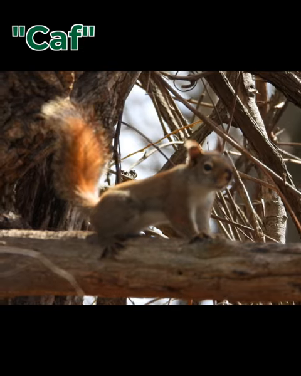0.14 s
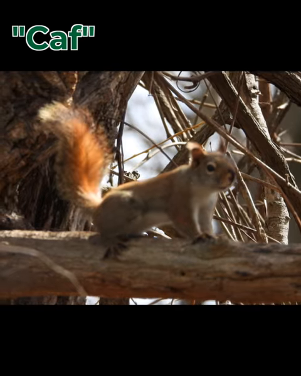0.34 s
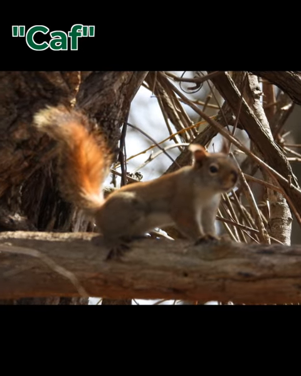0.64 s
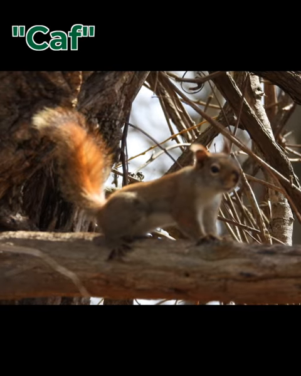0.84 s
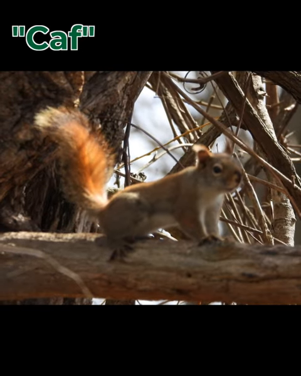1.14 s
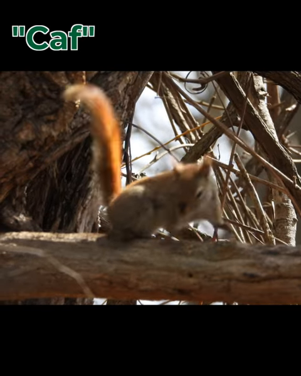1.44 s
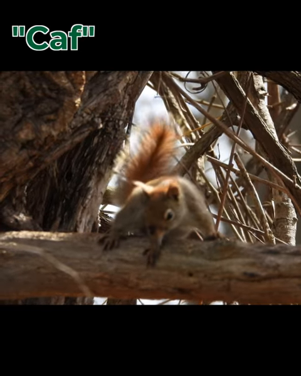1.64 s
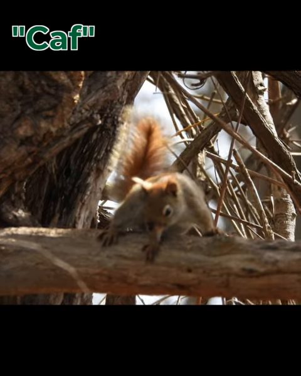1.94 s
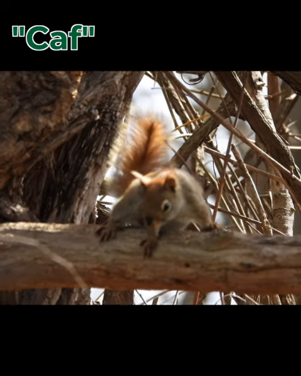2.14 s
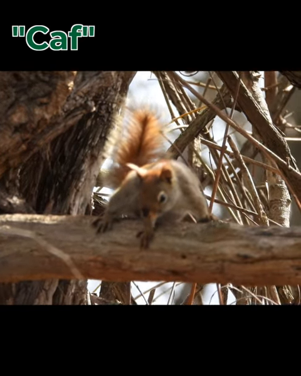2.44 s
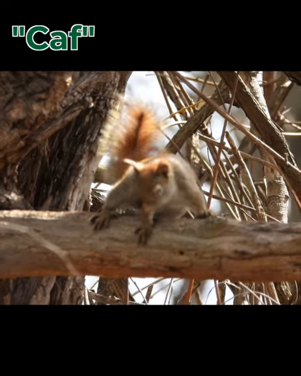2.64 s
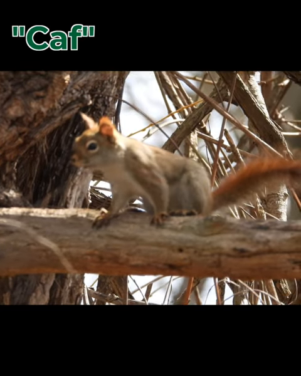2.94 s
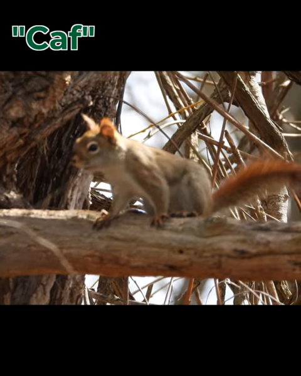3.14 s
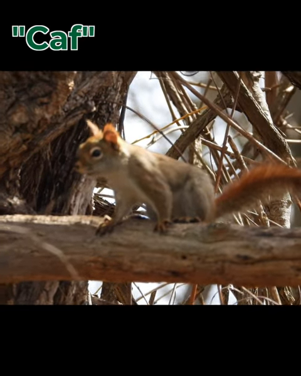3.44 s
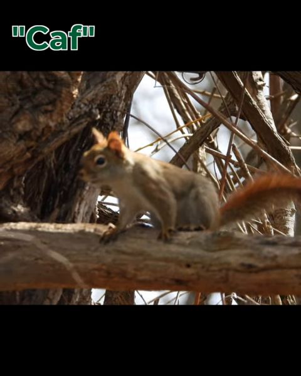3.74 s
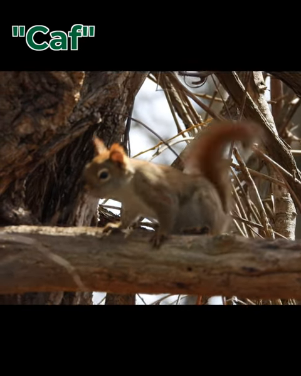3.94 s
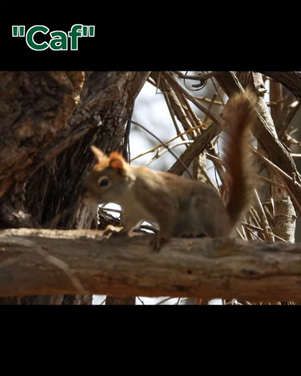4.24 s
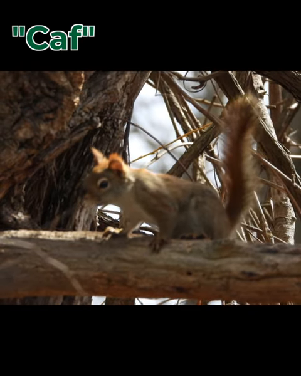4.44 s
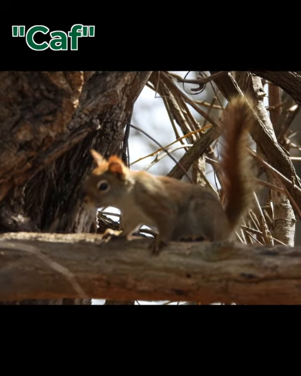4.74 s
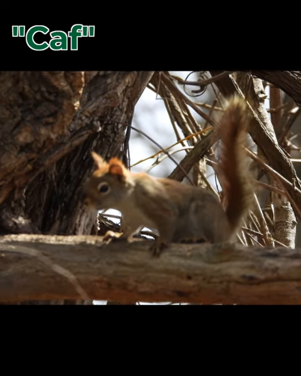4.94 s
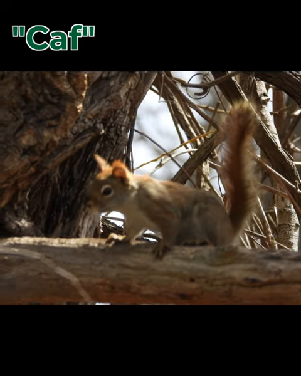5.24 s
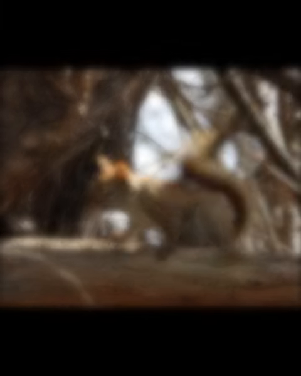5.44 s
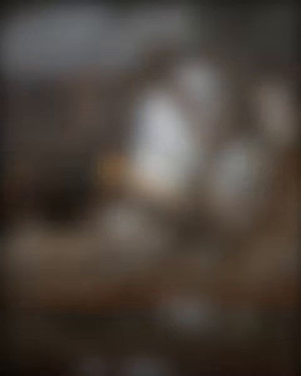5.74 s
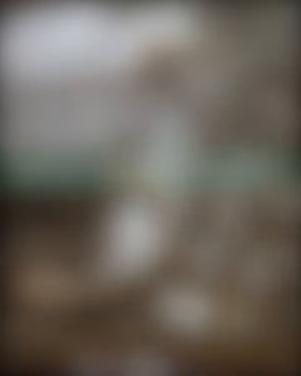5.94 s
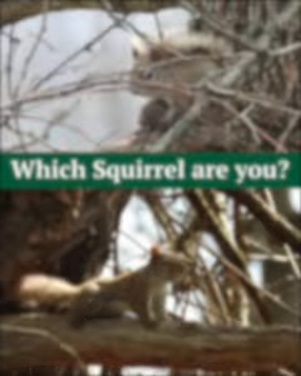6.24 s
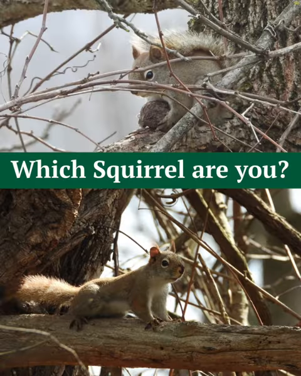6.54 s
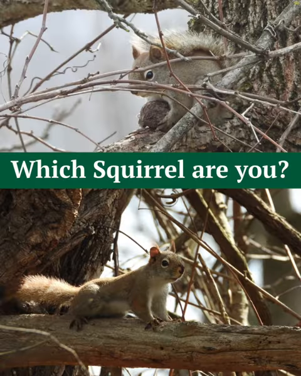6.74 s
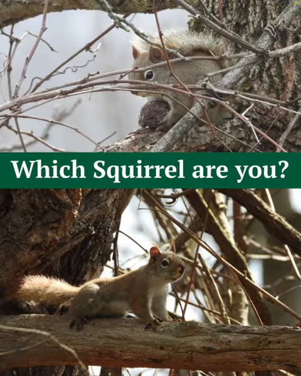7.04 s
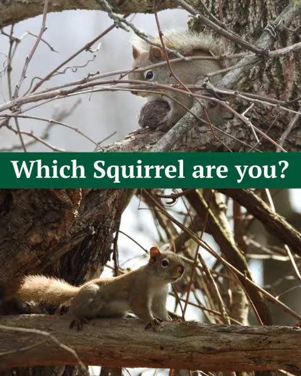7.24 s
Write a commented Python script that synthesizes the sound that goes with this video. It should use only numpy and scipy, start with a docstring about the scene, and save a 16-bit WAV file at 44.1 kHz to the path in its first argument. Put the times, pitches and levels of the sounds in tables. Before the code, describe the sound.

Outdoors among trees, a squirrel scolds close to a stereo microphone, slightly right. Six very short piercing squeaks come at uneven intervals, with softer, rough two-toned chucks between them. Thin bird chips sound early and late, and a quick high bird phrase falls near the middle. Claws scuff bark faintly. Soft hiss, distant rumble and a passing engine hum lie beneath, with a puff of air at the end.

```python
"""From the start filtered noise gives a hiss and a distant rumble with hollow swells, over a brief low bump.
At once a red squirrel scolds from a branch: frequency-modulated arched squeaks, with softer two-voiced chucks
between, until near the end. Birds chip thinly early and late; claws scuff the bark. From 1.6 s an engine hum swells
and fades; about 3 s comes a harmonic mew, then a quick bird phrase of paired tones. Near the end a puff of air
touches the microphone. Trunks and twigs scatter the animal sounds back as decaying noise echoes."""
import sys
import numpy as np
from scipy import signal
from scipy.io import wavfile
from scipy.ndimage import uniform_filter1d, map_coordinates

SR = 44100
rng = np.random.default_rng(int(sys.argv[2]) if len(sys.argv) > 2 else 0)


def to_wav(sig):
    """Store sig (one row per channel, or 1-D mono) as 16-bit WAV at the path in sys.argv[1].

    Samples outside -1..1 are clipped; the rate is SR.
    """
    pcm = np.clip(np.atleast_2d(sig), -1, 1) * 32767
    pcm = np.round(pcm).astype(np.int16)
    wavfile.write(sys.argv[1], SR, pcm.T)  # frames by channels


N = 325192
TIME = np.arange(N) / SR


def from_db(db):
    """Level in decibels to amplitude ratio."""
    return 10 ** (np.asarray(db) / 20)


def rms_one(x):
    """Normalise the mean power to 1."""
    return x / np.sqrt(np.mean(x ** 2) + 1e-20)


def along(rows, t):
    """Linear interpolation of each column of a curve at the times t."""
    s, *columns = np.transpose(rows)
    return [np.interp(t, s, c) for c in columns]


def at_hz(points, hz):
    """Interpolation of a spectrum on a logarithmic frequency axis."""
    f, value = np.transpose(points)
    return np.interp(np.log(hz + 1e-6), np.log(f), value)


def drift(rate, size):
    """Low-frequency random modulation: Gaussian knots of spread 1, rate per second, joined by lines."""
    knots = rng.standard_normal(8192)
    return np.interp(np.arange(size) * rate / SR, np.arange(len(knots)), knots)


def phase_of(hz):
    """Phase as the time integral of instantaneous frequency."""
    return 2 * np.pi * np.cumsum(hz) / SR


def fade(t, edge):
    """Raised-cosine gate whose two edges last edge, in the units of t."""
    to_nearest_end = np.minimum(t - t[0], t[-1] - t)
    return np.sin(np.pi / 2 * np.clip(to_nearest_end / edge, 0, 1)) ** 2


def passing(start, length, fade_s):
    """Amplitude envelope over the whole scene that fades in, stays and fades out."""
    out = np.zeros(N)
    add(out, start, fade(np.arange(0, length, 1 / SR), fade_s))
    return out


def envelope(t, attack_s, release_s, edge_db):
    """Exponential attack and release: the level climbs linearly from edge_db and sinks back to it."""
    toward_edge = np.maximum(1 - t / attack_s, 1 - (t[-1] - t) / release_s)
    return from_db(edge_db * np.clip(toward_edge, 0, 1))


def bump(t, at_s, width_s):
    """Gaussian pulse of height 1."""
    return np.exp(-((t - at_s) / width_s) ** 2)


def arch(t, rise_s, fall_s, scoop, dive):
    """Frequency ratio with parabolic ends: it scoops up to 1 and dives at the end."""
    scooped = scoop * np.clip(1 - t / rise_s, 0, 1) ** 2
    dived = dive * np.clip(1 - (t[-1] - t) / fall_s, 0, 1) ** 2
    return 1 - scooped - dived


def hoarse(phase, width_hz):
    """Random quadrature modulation: a band of noise that follows a pitch."""
    return drift(width_hz, len(phase)) * np.sin(phase) + drift(width_hz, len(phase)) * np.cos(phase)


def whistle(length, hz, glide_hz, waver_hz):
    """A sinusoid randomly frequency-modulated about a linear glide."""
    u = np.linspace(0, 1, int(length * SR))
    return fade(u, 0.085) * np.sin(phase_of(hz + glide_hz * (u - .5) + waver_hz * drift(900, len(u))))


def add(out, start, sound):
    """Linear superposition of a sound at its start time."""
    i = max(int(start * SR), 0)
    out[i:i + len(sound)] += sound[:N - i]


def stereo_noise(spectrum, patchy_db, wider_db=0):
    """Mid-side shaping of noise: mostly coherent in the bass and diffuse in the treble, in random patches."""
    # side level against the middle: (frequency [Hz], level [dB])
    width_points = [(60, -8), (110, -16.5), (200, -17), (380, -15.5), (700, -13), (1290, -11), (2380, -8.5),
                    (4400, -2), (8120, -0.5), (15000, 0.5)]
    # left-right balance: (frequency [Hz], left over right [dB])
    balance_points = [(60, 3), (150, -0.5), (380, 1.0), (950, 0.5), (2380, 1), (5980, -2.5), (15000, 3)]
    hz, s, (mid, side) = signal.stft(rng.standard_normal((2, N)), SR, nperseg=2048)
    # smooth the patches over frequency, then over time
    patches = uniform_filter1d(rng.standard_normal(mid.shape), size=3, axis=0)
    patches = rms_one(uniform_filter1d(patches, size=4, axis=1))
    hz, sign = hz[:, None], np.array([1, -1])[:, None, None]
    both = mid + sign * side * from_db(at_hz(width_points, hz) + wider_db)
    balance = sign * at_hz(balance_points, hz) / 2
    gain = from_db(at_hz(spectrum, hz) + balance + patchy_db * patches)
    return rms_one(signal.istft(both * gain, SR)[1][:, :N])


def swells(waver=0.068):
    """Slow amplitude modulation: faint hollow tones of wavering pitch rise out of the rumble and sink back."""
    # hollow tones: (start [s], length [s], pitch [Hz], level [dB])
    hollow_tones = [(0.04, 0.13, 399, -47), (0.227, 0.14, 347, -47.5), (0.823, 0.081, 358, -48.5),
                    (1.374, 0.25, 478, -47.5), (1.597, 0.078, 462, -42.5), (2.937, 0.12, 377.6, -44),
                    (4.492, .18, 351.5, -46.5), (5.413, 0.18, 384, -48)]
    out = np.zeros(N)
    for start, length, hz, db in hollow_tones:
        size = int(length * SR)
        tone = np.sin(phase_of(hz * (1 + waver * drift(56.8, size))))
        add(out, start, from_db(db) * np.hanning(size) * tone)
    return out


def engine_hum(third_db=-4):
    """A periodic source: a wavering fundamental with a third harmonic of randomly varying amplitude."""
    phase = phase_of(127.6 * (1 + .008 * drift(4, N)))
    third = from_db(third_db) * drift(9, N) * np.sin(3 * phase)
    return from_db(-59) * passing(start=1.57, length=2.85, fade_s=0.49) * (np.sin(phase) + third)


def bump_and_puff():
    """Gated low-frequency noise with a strong side signal: a low bump, and late a puff of air on the microphone."""
    # a brief low bump at the start, then the late puff: (start [s], length [s], level [dB])
    gust_rows = [(0, 0.057, -44), (7.09, 0.238, -45)]
    # relative spectrum of both: (frequency [Hz], level [dB])
    gust_spectrum = [(30, -34), (80, -10), (150, 3), (230, -6), (400, -64), (900, -64)]
    level = sum(from_db(db) * passing(start, length, fade_s=0.045) for start, length, db in gust_rows)
    return level * stereo_noise(gust_spectrum, patchy_db=-1.5, wider_db=17.0)


def background(swell_db=0.2, rumble_gain_db=0.5, hiss_gain_db=2):
    """Superposed sources: distant rumble and hiss as filtered noise, hollow swells, engine hum, bump and puff."""
    # relative spectrum of the rumble: (frequency [Hz], level [dB])
    rumble_spectrum = [(18, -69), (30, -44), (43, -43), (64, -33), (91, -9), (118, -4.5), (185, -2),
                       (213, -0.5), (259, -7), (357, -0.5), (419, -5.5), (578, -6), (772, -11),
                       (1070, -26.5), (1400, -33.5), (1820, -23), (3080, -120)]
    # relative spectrum of the hiss: (frequency [Hz], level [dB])
    hiss_spectrum = [(710, -20), (1200, -16.5), (1850, -10.5), (2040, -13), (2820, -10), (4130, -2.5),
                     (4890, 0), (5210, -1), (6310, -1.5), (7160, -4.5), (9130, -15), (10900, -22),
                     (12700, -29.5), (15000, -50)]
    # levels before the common gains: (time [s], rumble level [dB], hiss level [dB])
    background_levels = [(0.0, -53, -47.5), (0.51, -51.5, -48), (1.39, -51.5, -48.5), (5.09, -52, -46.5),
                         (5.77, -54.5, -49), (7.12, -51.5, -48), (7.37, -52, -47.5)]
    rumble_db, hiss_db = along(background_levels, TIME)
    rumble_level = from_db(rumble_db + rumble_gain_db + swell_db * drift(15, N))
    rumble = rumble_level * stereo_noise(rumble_spectrum, patchy_db=4.0)
    hiss = from_db(hiss_db + hiss_gain_db) * stereo_noise(hiss_spectrum, patchy_db=2.8)
    return rumble + swells() + hiss + engine_hum() + bump_and_puff()


def woods(x, pan_db, near_db, far_db, near_t60=0.14, far_t60=0.67, alike=0.43, build_s=0.0058,
          bark_hz=6500, twigs_db=-20, twigs_hz=5100):
    """Multiple scattering: nearby branches give a dense short echo, further trunks a longer wash."""
    t = TIME[:SR]
    shared, apart = rng.standard_normal(SR), rng.standard_normal((2, SR))
    share = np.clip(alike, 0, 1)  # power common to both channels
    scatter = np.sqrt(share) * shared + np.sqrt(1 - share) * apart
    scatter = scatter * np.clip(t / build_s, 0, 1) ** 2
    # t60: seconds to decay by 60 dB
    near, far = (rms_one(np.exp(-np.log(1000) * t / t60)) / np.sqrt(SR) for t60 in (near_t60, far_t60))
    echo = scatter * np.hypot(from_db(near_db) * near, from_db(far_db) * far)
    # twigs return one band most strongly; rough bark and needles swallow the treble
    echo = echo + from_db(twigs_db) * signal.lfilter(*signal.iirpeak(twigs_hz, 5, fs=SR), echo)
    echo = signal.sosfilt(signal.butter(2, bark_hz, fs=SR, output="sos"), echo)
    scattered = signal.fftconvolve(x[None], echo, axes=1)[:, :N]
    return (x + scattered) * from_db(np.array([[1], [-1]]) * pan_db / 2)


def between_ports(x, lag_samples):
    """Interchannel time difference: the sound reaches the left port a moment after the right one."""
    return np.array([map_coordinates(x[0], [np.arange(N) - lag_samples], order=3), x[1]])


def distant_calls(clear_waver_hz=90, buzzy_waver_hz=320, slur_width_hz=1400):
    """Frequency glides: bird chips dive ever faster, hoarse slurs rise, paired and lone whistles stay nearly level."""
    # small birds' falling chips: (start [s], length [s], starting pitch [Hz], level [dB])
    chip_rows = [(0.344, .014, 5100, -40), (.356, 0.0074, 6500, -35), (0.412, 0.01, 5020, -36),
                 (0.418, 0.015, 5450, -30), (0.435, 0.0083, 5400, -38), (2.494, 0.017, 5150, -42),
                 (5.766, 0.015, 7700, -30), (7.238, 0.014, 7800, -24)]
    # hoarse rising slurs: two faint, like distant chucks, then two from a bird:
    # (start [s], length [s], from pitch [Hz], to pitch [Hz], level [dB])
    slur_rows = [(2.197, 0.055, 3890, 4150, -52), (2.336, .08, 3950, 4160, -49),
                 (5.712, .04, 2590, 4630, -43.5), (7.188, 0.037, 2895, 4600, -42.5)]
    # one bird's two-voiced notes:
    # (start [s], clear pitch [Hz], clear level [dB], buzzy pitch [Hz], buzzy level [dB])
    phrase_rows = [(3.461, 7480, -44, 6800, -38.5), (3.597, 7500, -41.5, 6550, -42),
                   (3.723, 7880, -41, 7070, -41), (3.831, 8290, -41, 7400, -42),
                   (3.96, 7870, -43.5, 7700, -47)]
    # lone thin whistles: (start [s], length [s], middle pitch [Hz], glide [Hz], level [dB])
    whistle_rows = [(2.368, 0.056, 4115, 120, -48), (4.514, 0.15, 5950, -250, -47.5),
                    (4.706, 0.097, 4540, 80, -43.5), (4.806, 0.31, 4760, 122, -45.5),
                    (5.567, 0.039, 6800, -60, -50), (5.643, 0.029, 2280, 3, -53),
                    (6.434, 0.12, 6860, -64, -48), (7.119, 0.026, 2254, 0, -50.5)]
    out = np.zeros(N)
    for start, length, hz, db in chip_rows:
        u = np.linspace(0, 1, int(length * SR))
        falling_hz = hz * (1 - 0.243 * u ** 1.78)  # loses 24.3 % of its pitch
        add(out, start, from_db(db) * np.sin(np.pi * u ** 2.43) * np.sin(phase_of(falling_hz)))
    for start, length, from_hz, to_hz, db in slur_rows:
        u = np.linspace(0, 1, int(length * SR))
        phase = phase_of(from_hz + (to_hz - from_hz) * u)
        add(out, start, from_db(db) * fade(u, 0.14) * hoarse(phase, slur_width_hz))
    note_s, note_glide_hz = 0.056, -62
    for start, clear_hz, clear_db, buzzy_hz, buzzy_db in phrase_rows:
        add(out, start, from_db(clear_db) * whistle(note_s, clear_hz, note_glide_hz, clear_waver_hz))
        add(out, start, from_db(buzzy_db) * whistle(note_s, buzzy_hz, note_glide_hz, buzzy_waver_hz))
    flicker_db, flickers_per_s = 2.5, 72
    for start, length, hz, glide_hz, db in whistle_rows:
        note = whistle(length, hz, glide_hz, waver_hz=0.027 * hz)
        add(out, start, from_db(db + flicker_db * drift(flickers_per_s, len(note))) * note)
    return out


def scuffs(spread=1.35):
    """Friction noise: claws on bark give short gritty bursts of impulsive, band-passed noise."""
    # scuffs: (start [s], length [s], centre frequency [Hz], level before the bell-shaped window [dB])
    scuff_rows = [(0.349, 0.043, 5100, -42.5), (2.392, 0.013, 5700, -43), (3.664, 0.0094, 4900, -38),
                  (5.873, 0.035, 4960, -42.5)]
    out = np.zeros(N)
    ratio = max(spread, 1.05)
    for start, length, hz, db in scuff_rows:
        grit = rng.laplace(size=SR)[:int(length * SR)]
        band = signal.butter(2, [hz / ratio, hz * ratio], "band", fs=SR, output="sos")
        rub = rms_one(signal.sosfilt(band, signal.sosfilt(band, grit)))
        add(out, start, from_db(db) * rub * np.hanning(len(grit)))
    return out


def mew(third_db=0):
    """Harmonic synthesis with a missing fundamental: a soft arch heard in its second and third harmonics."""
    start_s, length_s, top_hz, crest_s = 2.995, 0.045, 1785, 0.021
    out, t = np.zeros(N), np.arange(0, length_s, 1 / SR)
    # scoop and dive are shares of the pitch
    phase = phase_of(top_hz * arch(t, crest_s, length_s - crest_s, scoop=0.171, dive=0.11))
    gain = from_db(-33.5) * envelope(t, attack_s=0.031, release_s=0.015, edge_db=-12) * fade(t, 0.0027)
    add(out, start_s, gain * (np.sin(2 * phase) + from_db(third_db) * np.sin(3 * phase)))
    return out


def chucks(second_db=-4.0, fourth_db=-22, fifth_db=-33, rise_waver_hz=25, rasp_db=-22, rasp_width_hz=1500):
    """Beating of two voices: a hoarse low arch against a harmonic stack that sweeps up and sinks back."""
    # softer calls:
    # (start [s], low voice level [dB], rising voice level [dB], low pitch [Hz], rising fundamental's crest [Hz])
    chuck_rows = [(.263, -34, -30, 3920, 1970), (.751, -34, -32, 3830, 1983), (1.315, -31, -34, 3797, 1953),
                  (3.616, -31, -28, 3747, 1930), (4.022, -28.5, -25.5, 3930, 2074),
                  (4.621, -26.5, -20.5, 3896, 2024), (5.184, -26.5, -25.5, 3880, 1990),
                  (6.03, -42, -35, 3800, 1900), (6.105, -36, -34, 3735, 1955),
                  (6.615, -29.5, -34.5, 3854, 1964), (7.106, -39, -40, 3750, 1870)]
    sweep_hz, crest_s, sink_s = 599, 0.028, 0.0595
    attack_s, hold_s, edge_db, decay_db_per_s = .017, .003, -30, 2600
    reference_db, brightening = -42, 0.28  # overtones gain 0.28 dB per dB above the reference
    out, t = np.zeros(N), np.arange(0, 0.059, 1 / SR)
    # scoop and dive are shares of the pitch
    low_ratio = arch(t, rise_s=0.01795, fall_s=0.0303, scoop=.16, dive=0.137)
    low_gain = envelope(t, attack_s=0.021, release_s=0.024, edge_db=-16.5)
    from_crest = np.maximum(1 - t / crest_s, (t - crest_s) / sink_s)
    below_crest_hz = sweep_hz * np.sin(np.pi / 2 * from_crest) ** 2
    onset_db = edge_db * np.maximum(1 - t / attack_s, 0)
    decay_db = -decay_db_per_s * np.maximum(t - attack_s - hold_s, 0)
    for start, low_level, rise_level, hz, crest_hz in chuck_rows:
        # the low voice dissolves into a narrow band of noise as the call goes on, with a wider rasp around it
        breakup = np.clip(t / .035, .2, .7)
        phase = phase_of(hz * low_ratio + 85 * drift(450, len(t)))
        noise = hoarse(phase, 550) + from_db(rasp_db) * hoarse(phase, rasp_width_hz)
        low = np.sqrt(1 - breakup ** 2) * np.sin(phase) + breakup * noise
        phase = phase_of(crest_hz - below_crest_hz + rise_waver_hz * drift(554, len(t)))
        # the upper harmonics flash on the way up; the second grows and outlasts them
        second = from_db(second_db) * np.minimum(t / crest_s, 1) ** 2 * np.sin(2 * phase)
        third = from_db(onset_db) * np.sin(3 * phase)
        overtones = sum(from_db(db) * np.sin(k * phase) for k, db in ((4, fourth_db), (5, fifth_db)))
        # a louder rising voice is richer in overtones
        brightness = from_db(onset_db / 5 + brightening * (rise_level - reference_db))
        stack = from_db(decay_db) * (third + brightness * overtones)
        call = from_db(low_level) * low_gain * (low + second) + from_db(rise_level) * stack
        add(out, start, call * fade(t, .003))
    return out


def squeaks(flutter_rate_hz=335, jitter_hz=55, dive_jitter_hz=55, dive_rough=0.12, undertone_db=-26,
            sum_tone_db=-28, octave_db=-46, fizz_db=-21, tick_db=-33):
    """Frequency modulation of an arched whistle that roughens as it dives, mixing with a lower voice."""
    # loud squeaks: (start [s], length [s], top pitch [Hz], level [dB], flutter depth [Hz],
    # held back for [s], held flat by [Hz], held back by [dB], final dive [s], bend of the dive [1 = straight],
    # rasp level [dB], boost of undertone and sum tone [dB])
    squeak_rows = [(.027, 0.059, 6200, -11.5, 90, 0.018, 404, -10.5, 0.015, 1.7, -24, -1),
                   (1.598, .068, 6300, -18, 30, 0.031, 795, -5.5, 0.014, 0.93, -19.5, -11),
                   (2.825, .078, 6430, -16.5, 90, 0.014, 600, -6, 0.023, 1.55, -13, -1.5),
                   (4.106, 0.056, 6356, -14, 50, .0099, 695, -12, 0.018, 1.4, -19, 1),
                   (5.604, .057, 6340, -16.5, 50, .011, 550, -10, 0.016, 1.68, -25, 5),
                   (5.906, 0.049, 5977, -10.5, 205, 0.014, 100, -15, 0.0085, 1.8, -35, -7.5)]
    # the voice catches (dips) or bursts out (peaks): (time [s], half-width [s], level change [dB])
    break_rows = [(.08, 0.003, 1), (1.603, 0.0013, -15), (1.648, 0.005, 0.5), (1.654, 0.00073, -5),
                  (2.8554, .002, 5.5), (2.865, .006, -4.5), (2.875, 0.0034, 3.5), (2.881, 0.0016, -15),
                  (2.8855, 0.0036, 3.5), (2.89, 0.0011, -20), (4.149, 0.0012, -1), (4.154, 0.0017, 7.5),
                  (5.646, .0013, -12), (5.6502, 0.0012, 5.5), (5.657, 0.0027, 5.5)]
    opening_s = 0.0041  # the voice is held back at first, then opens fully
    scoop_hz, scoop_power, dive_to_hz = 1562, 8.5, 4360
    sag_hz, sag_from = 340, 0.402  # sag begins at this share of the length
    low_hz, low_sink_hz = 3255, 386  # the lower voice
    out = np.zeros(N)
    fizz_band = signal.butter(4, [8700, 11000], "band", fs=SR, output="sos")
    tick_u = np.linspace(0, 1, SR // 200)
    tick = np.sin(np.pi * tick_u) * np.sin(phase_of(4500 + 2000 * tick_u))
    for (start, length, top_hz, db, flutter, held_s, flat_hz, held_db,
         dive_s, bend, rasp_db, under_db) in squeak_rows:
        t = np.arange(0, length, 1 / SR)
        u = t / length
        held = (1 - np.tanh((t - held_s) / opening_s)) / 2
        # pitch: scoop up to the top, sag past the crest, dive at the end
        scoop = np.maximum(scoop_hz * (1 - u) ** scoop_power, flat_hz * held)
        sag = sag_hz * np.clip((u - sag_from) / (1 - sag_from), 0, 1) ** 1.36
        dive = np.clip(1 - (length - t) / dive_s, 0, 1) ** bend
        hz = top_hz - scoop - sag
        hz = hz + (dive_to_hz - hz) * dive
        breaks = sum(size_db * bump(start + t, at_s, width_s) for at_s, width_s, size_db in break_rows)
        gain = from_db(db + held_db * held + breaks)
        gain = gain * envelope(t, attack_s=0.0061, release_s=0.0094, edge_db=-10.5)
        swing = np.sin(phase_of(flutter_rate_hz * (1 + .03 * drift(100, len(t)))))
        jitter = (jitter_hz + dive_jitter_hz * dive) * drift(712.5, len(t))
        phase = phase_of(hz + flutter * swing + jitter)
        # the lower voice hums almost level, sinks a little and escapes the holding back
        under = phase_of(low_hz - low_sink_hz * u ** 2 + jitter_hz * drift(457, len(t)))
        undertone = from_db(undertone_db - held_db * held) * np.sin(np.pi * u ** .6) ** 2 * np.sin(under)
        sum_tone = from_db(sum_tone_db) * (1 - dive) ** 2 * (1 - held) * np.sin(phase + under)
        # turbulent air: a rasp under the whistle grows once the voice opens, a fizz above it grows throughout
        rasp_tone = np.sin(phase_of(.75 * top_hz + 400 * drift(1500, len(t))))
        rasp = from_db(rasp_db) * u * (1 - held) * drift(2200, len(t)) * rasp_tone
        fizz_noise = rms_one(signal.sosfilt(fizz_band, rng.standard_normal(SR)))[:len(t)]
        fizz = from_db(fizz_db + rasp_db / 2) * np.sqrt(2 * u) * fizz_noise
        octave = from_db(octave_db) * u * np.sin(2 * phase)
        rough = dive_rough * np.sqrt(dive) * drift(1100, len(t))
        voice = np.sin(phase) * (1 + swing * flutter / 1800 + rough)
        voice = voice + from_db(under_db) * (undertone + sum_tone) + octave
        # the breaks leave the turbulent air untouched
        turbulence = (rasp + fizz) * from_db(-breaks)
        add(out, start, (voice + turbulence) * gain * fade(t, 0.0014))
        # the throat opens with a tiny upward flick
        add(out, start - len(tick) / SR, from_db(tick_db) * tick)
    return out


def scene():
    """Direct-to-scattered ratio as distance cue: squirrel close, a little to the right; far calls deeper in the trees."""
    # the squirrel turns its head: (time [s], left over right [dB])
    facing = [(0, -1.5), (2.9, -2.1), (5.6, -3.6)]
    far = woods(distant_calls(), pan_db=-2.5, near_db=-2, far_db=-5, near_t60=0.14, far_t60=0.6,
                build_s=.007, bark_hz=8800)
    soft = woods(chucks() + mew() + scuffs(), pan_db=-.5, near_db=-5.5, far_db=-9.5,
                 near_t60=.18, far_t60=.55)
    loud = woods(squeaks(), pan_db=along(facing, TIME)[0], near_db=-5.0, far_db=-15.5,
                 near_t60=0.19, far_t60=0.58, alike=0.27, build_s=0.007, bark_hz=12300, twigs_db=-12)
    return between_ports(loud, lag_samples=1.0) + soft + far + background()


def record(dry):
    """Band limitation: a steep elliptic low-pass at 14.8 kHz removes the top."""
    return signal.sosfilt(signal.ellip(10, .1, 90, 14800, fs=SR, output="sos"), dry)


dry = scene()
out = record(dry)
to_wav(out)
```